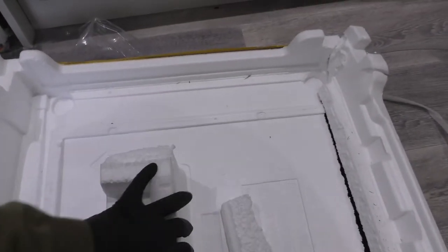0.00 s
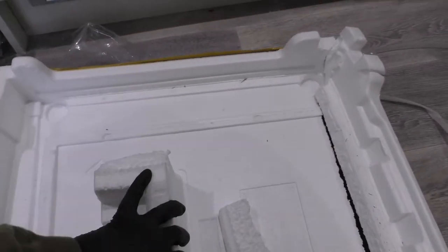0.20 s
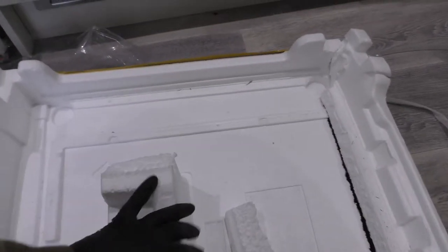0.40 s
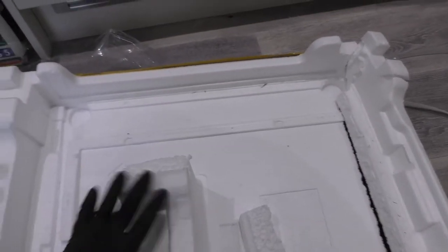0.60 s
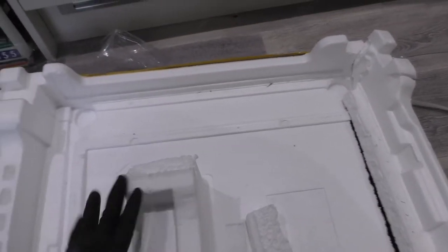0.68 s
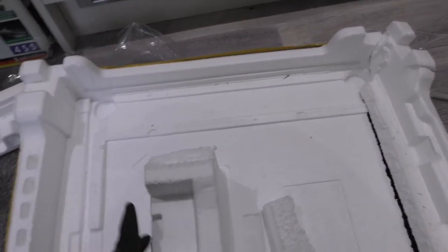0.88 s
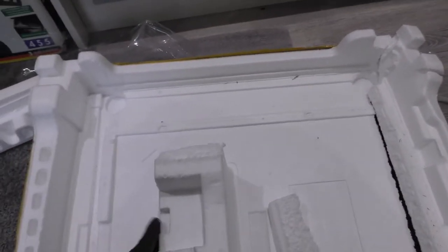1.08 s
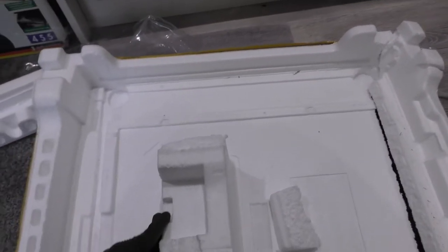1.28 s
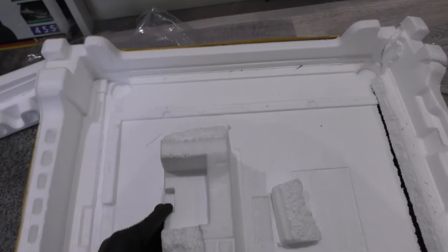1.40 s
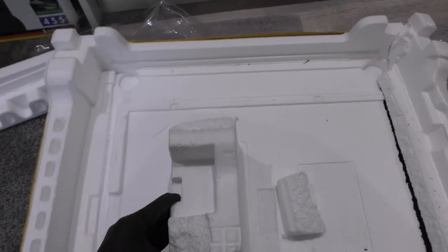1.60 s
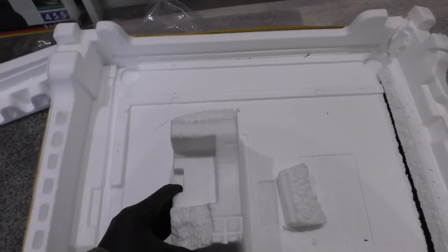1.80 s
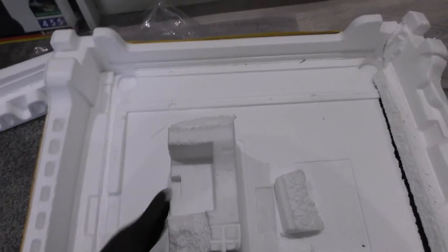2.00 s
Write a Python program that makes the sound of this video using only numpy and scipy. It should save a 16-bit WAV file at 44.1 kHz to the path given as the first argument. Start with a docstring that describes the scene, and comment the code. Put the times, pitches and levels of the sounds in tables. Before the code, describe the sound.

A hand rubs and knocks a big foam tray: harsh squeaky scrapes, crisp snaps, low thumps

```python
"""Hand on a foam tray

A hand rubs, squeezes and knocks a large foam tray in a quiet room. Slipping beads are dense random
impulses through foam colour and resonances; squeaks and squeals are wavering sines; cracks are noise snaps.
The light panel booms near 350 Hz: decaying sines, swelling tones and noise-driven modes.
Feedback delays add the room, over coloured noise and a faint low drone; gain ducks after loud moments."""
import sys
import numpy as np
from scipy import signal
from scipy.fft import rfft, irfft, next_fast_len
from scipy.io import wavfile
from scipy.ndimage import uniform_filter1d

SR = 44100
rng = np.random.default_rng(int(sys.argv[2]) if len(sys.argv) > 2 else 0)


def to_linear_factor(level_db):
    """Convert decibel levels (scalar or array-like) to linear amplitude factors."""
    exponent = np.asarray(level_db, float) / 20
    return 10 ** exponent


def inscribe(sig):
    """Save sig as 16-bit PCM at rate SR to the path in sys.argv[1].

    A 1-D sig is mono; a 2-D sig holds one channel per row.
    Samples are clipped to [-1, 1] before scaling.
    """
    pcm = np.round(np.clip(np.atleast_2d(sig).T, -1, 1) * 32767)
    wavfile.write(sys.argv[1], SR, pcm.astype(np.int16))


N = 90405


def rms_one(x):
    """Scale to rms 1."""
    return x / np.sqrt(np.mean(x ** 2) + 1e-20)


def since(start_s):
    """Seconds since a moment, negative before it."""
    return np.arange(N) / SR - start_s


def in_time(rows):
    """Table columns interpolated linearly over time."""
    time_s, *columns = np.transpose(rows)
    return [np.interp(since(0), time_s, column) for column in columns]


def gate(rows, fade_s):
    """Open from the first to the last row, with linear fades inside."""
    return np.clip(np.minimum(since(rows[0][0]), -since(rows[-1][0])) / fade_s, 0, 1)


def band(x, low_hz, high_hz, order=2):
    """Butterworth band-pass."""
    return signal.sosfilt(signal.butter(order, [low_hz, high_hz], "band", fs=SR, output="sos"), x)


def colour(x, spectrum):
    """Shape by a spectrum table, log-frequency interpolation, rms 1."""
    hz, db = np.transpose(spectrum)
    f = np.maximum(np.arange(N // 2 + 1) * SR / N, 1)
    gain_db = np.interp(np.log(f), np.log(hz), db)
    return rms_one(irfft(rfft(x) * to_linear_factor(gain_db), N))


def resonance(x, hz, width_hz):
    """Two-pole peak, gain about 1 on top."""
    r = np.exp(-np.pi * width_hz / SR)
    numerator = [(1 - r * r) / 2, 0, (r * r - 1) / 2]
    return signal.lfilter(numerator, [1, -2 * r * np.cos(2 * np.pi * hz / SR), r * r], x + 1e-18)


def wobble(rate_hz):
    """Noise through two equal low-pass poles, rms 1."""
    r = np.exp(-2 * np.pi * rate_hz / SR)
    noise = rng.standard_normal(N + 4000)
    return rms_one(signal.lfilter([1], [1, -2 * r, r * r], noise)[4000:])  # drop the settling


SLIPS_PER_S, SLIP_SPREAD_DB = 16000, 2.5


def slips():
    """Dense bead slips: random-sign impulses of uneven strength."""
    hit = rng.random(N) < SLIPS_PER_S / SR
    strength = to_linear_factor(SLIP_SPREAD_DB * np.minimum(rng.exponential(1, N), 4))
    return hit * strength * rng.choice([-1, 1], N)


# rubbing strength: time_s, treble_db, then relative to treble: high_db, middle_db, dull_db
RUB_LEVELS = [(0.0, -44.5, 3, 6.5, 11), (0.02, -45, -0.5, 1, -4.5), (0.141, -71, -7, 6.5, 8),
              (0.147, -45, 0.5, 2, 0), (0.2, -52.5, -2, 4.5, 0.5), (0.22, -45, 12, 5, -3),
              (0.226, -42.5, 5, 11.5, 6), (0.28, -48.5, -4.5, 6.5, 2.5), (0.32, -51.5, 2, 5.5, 4),
              (0.33, -36, 2, 8, -2.5), (0.35, -23, 0.5, -0.5, -22), (0.38, -23, -7, -5, -45),
              (0.39, -32, -4, -10, -26), (0.41, -28, -4.5, -8.5, -46), (0.44, -35, 7, 2, -33),
              (0.45, -35, 0.5, -3, -13), (0.6, -50.5, -6.5, 7, 5), (0.64, -48, -8, 13.5, 15),
              (0.71, -46, 4.5, 7, 1.5), (0.8, -56, 0, 5.5, 15), (0.866, -53, 4, 6, 4),
              (0.89, -39, -6, 11.5, 7.5), (0.92, -28.5, 1.5, -1.5, -1), (0.95, -36, 0.5, 4.5, -1),
              (1.0, -33, 3, 0.5, -8.5), (1.06, -36.5, 0, -1.5, -3), (1.14, -31.5, -5.5, -3.5, -8),
              (1.17, -36.5, -5, 3, -4), (1.18, -30, 1, -3, -17.5), (1.23, -33.5, 5.5, -7, -13.5),
              (1.38, -51.5, -1, -6.5, -9.5), (1.518, -67, 1, 7, 13.5), (1.54, -55.5, 6.5, 5, 4),
              (1.592, -72, 3, -1, 8), (1.6, -52.5, 5, 3.5, 10.5), (1.64, -61.5, 1, 5, 1),
              (1.73, -57.5, -4, 6.5, 13.5), (1.75, -38.5, -3.5, 4, 0), (1.83, -58, -3.5, 6, 3.5),
              (2.05, -77, 2, -2, 18.5)]
# foam colour: frequency_hz, density_db (per Hz)
FOAM_COLOUR = [(300, -49), (500, -1), (580, -20), (670, -12.5), (800, -17.5), (1100, -6.5), (1550, -8),
               (2300, -4.5), (3000, -5), (6000, -6.5), (10500, -3.5), (13000, -7), (15800, -5.5),
               (19000, -7)]
# treble, high, middle, dull bands: low_hz, high_hz
RUB_BAND_EDGES = [(4180, 7700), (8400, 13900), (1730, 3710), (543, 1520)]
CLUMP_DB, RUB_GAIN_DB = 2, -2


def rub():
    """Slips coloured by the foam; four bands follow the pressure, each with its own clumps."""
    treble_db, high_db, middle_db, dull_db = in_time(RUB_LEVELS)
    x = colour(slips() * to_linear_factor(0.92 * wobble(160)), FOAM_COLOUR)
    treble, high, middle, dull = [
        rms_one(band(x, low_hz, high_hz, order=3) * to_linear_factor(CLUMP_DB * wobble(65)))
        for low_hz, high_hz in RUB_BAND_EDGES]
    mix = treble + to_linear_factor(high_db) * high + to_linear_factor(middle_db) * middle + to_linear_factor(dull_db) * dull
    return to_linear_factor(RUB_GAIN_DB + treble_db) * mix


# rubbed foam resonances: pitch_hz, width_hz, stroke_1_db, stroke_2_db, stroke_3_db
FOAM_MODES = [(1960, 140, -16, 3, -10.5), (2296, 70, -8, -0.5, -12), (2656, 90, 2, -7, -17),
              (3220, 90, -4, -14, -31), (4780, 80, 2, -8, -19), (5490, 260, -2, -3, -7.5),
              (6600, 89, -15, -8, -12), (7290, 150, -26, -22, -11), (7920, 120, -18, -23, 1),
              (8460, 86, -16, -21, -2.5), (9340, 150, -1.5, -9, -0.5), (10430, 160, -7, -5.5, -3),
              (12000, 150, -13, -4.5, -11)]
# three hard strokes, each a list of: time_s, level_db
STROKE_LEVELS = [
    [(0.32, -34), (0.33, -36), (0.362, -15), (0.384, -25), (0.414, -29.5), (0.436, -20.5), (0.454, -28),
     (0.506, -34), (0.6, -54)],
    [(0.87, -34), (0.89, -30), (0.994, -26), (1.05, -49)],
    [(1.17, -33), (1.18, -34), (1.222, -31), (1.23, -29), (1.244, -35), (1.256, -25), (1.274, -30),
     (1.322, -32.5), (1.42, -54.5)],
]
STROKE_GAIN_DB, RING_FLUTTER_DB = -3.5, 2.2


def strokes():
    """Hard strokes make the foam resonances sing, each with its own flutter."""
    rings = [rms_one(resonance(slips(), hz, width_hz)) * to_linear_factor(RING_FLUTTER_DB * wobble(40))
             for hz, width_hz, *_ in FOAM_MODES]
    out = np.zeros(N)
    for k, rows in enumerate(STROKE_LEVELS):
        song = rms_one(sum(to_linear_factor(mode[2 + k]) * ring for mode, ring in zip(FOAM_MODES, rings)))
        out += gate(rows, 0.0047) * to_linear_factor(in_time(rows)[0] + STROKE_GAIN_DB) * song
    return out


# stick-slip squeaks, each a list of: time_s, slip_rate_hz, level_db
SQUEAK_TRACKS = [
    [(0.32, 2327, -43), (0.356, 2463, -25), (0.408, 2642, -40), (0.438, 2590, -19.5), (0.452, 2605, -38.5),
     (0.516, 2673, -32.5), (0.568, 2680, -47), (0.58, 2614, -44)],
    [(0.87, 2136, -51), (0.9, 2105, -30), (0.93, 2087, -25), (0.986, 2210, -38), (1.05, 2580, -57)],
    [(1.17, 2490, -46), (1.178, 2460, -23), (1.23, 2430, -45)],
]
# one lower squeak: time_s, slip_rate_hz, level_db
LOW_SQUEAK_TRACK = [(1.03, 1480, -48), (1.076, 1485, -36), (1.17, 1540, -42)]
# harmonics 2 to 5, relative to the fundamental: level_db
OVERTONE_LEVELS_DB = [-9, -11.5, -18, -29]
SQUEAK_JITTER_RATIO, SQUEAK_GAIN_DB = 0.0353, -3


def squeaks():
    """Nearly regular slips: a wavering tone with overtones, broken up in level."""
    out = np.zeros(N)
    for rows in [*SQUEAK_TRACKS, LOW_SQUEAK_TRACK]:
        hz, db = in_time(rows)
        phase = 2 * np.pi * np.cumsum(hz * (1 + SQUEAK_JITTER_RATIO * wobble(301.5))) / SR
        tone = np.sin(phase)
        for k, overtone_db in enumerate(OVERTONE_LEVELS_DB):
            tone += to_linear_factor(overtone_db) * np.sin((k + 2) * phase)
        out += gate(rows, 0.0065) * to_linear_factor(db + SQUEAK_GAIN_DB + 2.3 * wobble(130)) * tone
    return out


# short squeals: start_s, length_s, pitch_hz, level_db
SQUEAL_EVENTS = [(0.33, 0.014, 2130, -23.5), (1.0, 0.043, 2750, -39), (1.001, .04, 4910, -33.5),
                 (0.368, 0.014, 4790, -22), (0.347, 0.018, 9400, -34), (0.428, 0.016, 3210, -23),
                 (0.351, 0.015, 2400, -20), (0.633, 0.014, 940, -29.5), (0.33, 0.026, 2400, -24.5),
                 (0.927, 0.011, 2050, -32), (0.976, 0.015, 2330, -29.5), (1.1755, .009, 2500, -26),
                 (1.179, 0.011, 7290, -22), (1.19, 0.013, 7310, -22.5), (1.192, 0.01, 6460, -27),
                 (1.195, 0.0067, 11500, -27), (1.196, 0.0072, 10600, -22), (1.196, 0.0071, 5270, -29),
                 (1.21, .014, 7570, -25), (1.226, .008, 10500, -21.5), (1.229, 0.01, 12000, -30),
                 (1.251, .006, 8400, -32), (1.256, 0.0053, 9726, -22), (1.256, 0.0065, 13100, -26),
                 (1.264, 0.028, 8400, -34), (1.52, 0.0049, 2100, -44), (1.531, 0.0076, 4300, -50),
                 (1.627, 0.0077, 3300, -52), (1.594, .008, 6660, -52), (1.595, 0.0052, 4300, -45),
                 (1.841, 0.0072, 4300, -55)]
SQUEAL_WAVER_HZ, SQUEAL_GAIN_DB = 90.2, 1.5


def squeals():
    """Brief narrow whistles as a bead sings: a wavering tone that starts fast and flutters."""
    out = np.zeros(N)
    for start_s, length_s, hz, db in SQUEAL_EVENTS:
        phase = 2 * np.pi * np.cumsum(hz + SQUEAL_WAVER_HZ * wobble(246)) / SR
        tone = np.sin(phase) * to_linear_factor(1.6 * wobble(190))
        progress = np.clip(since(start_s) / length_s, 0, 1)
        envelope = np.clip(np.sin(np.pi * progress ** 0.86), 0, 1) ** 0.87
        out += to_linear_factor(db + SQUEAL_GAIN_DB) * tone * envelope
    return out


# cracks: start_s, level_db, low_db (relative to level), top_db (relative to level), t60_s
CRACK_EVENTS = [(0.1439, -34, 7.5, -14, 0.049), (0.2131, -30, -16, 9, 0.029),
                (0.4317, -29, -36, -14, 0.028), (0.6236, -30, 8, -17, 0.048),
                (0.641, -27.5, 14, -19, 0.035), (0.654, -23.5, 4.5, -5, 0.029),
                (0.691, -27.5, -6, 0.5, 0.069), (0.875, -29.5, 4.5, -14, 0.032),
                (1.1754, -14, -26, -7, 0.031), (1.1909, -17, -26, 8, 0.045), (1.2276, -26, -27, -1, 0.039),
                (1.2508, -26, -36, 13, 0.054), (1.519, -37.5, 5.5, -10, 0.03),
                (1.5314, -34, 5.5, 4.5, 0.02), (1.595, -39, 4.5, -12, 0.037),
                (1.628, -36.5, -19, -19, 0.03), (1.7419, -27.5, -4, -10, 0.036),
                (1.8412, -34, -14, -1.5, 0.028), (1.9006, -38, -16, -9, 0.036),
                (1.9883, -41.5, 3, -2, 0.022), (2.017, -44.5, 5.5, -19, 0.037)]
CRACK_GAIN_DB, CRACK_ATTACK_S = -8, 0.0013


def cracks():
    """Fast-dying snaps of noise, duller and brighter parts with their own strength."""
    noise = rng.standard_normal((3, N)) * to_linear_factor(3.2 * wobble(420))
    mid = rms_one(band(noise[0], 2000, 7500))
    low = rms_one(band(noise[1], 800, 1900, order=3))
    top = rms_one(band(noise[2], 7500, 19000))
    out = np.zeros(N)
    for start_s, db, low_db, top_db, t60_s in CRACK_EVENTS:
        t = np.maximum(since(start_s), 0)
        envelope = to_linear_factor(db + CRACK_GAIN_DB - 60 * t / t60_s) * np.minimum(t / CRACK_ATTACK_S, 1)
        out += envelope * (mid + to_linear_factor(low_db) * low + to_linear_factor(top_db) * top)
    return out


# knocks on the panel: start_s, level_db, pitch_hz, t60_s, thud_db (relative to level)
KNOCK_EVENTS = [(0.1435, -27, 322, 0.027, -3), (0.238, -15, 248, 0.032, -13),
                (0.255, -19.5, 265, 0.046, -29), (0.522, -26, 330, 0.033, -13),
                (0.544, -28, 339, 0.022, -18), (0.629, -25, 347, 0.049, -17), (0.657, -20, 356, 0.051, -15),
                (0.748, -26, 396, 0.023, -11), (1.085, -26, 355, 0.035, -33), (1.532, -27, 368, 0.032, -9),
                (1.595, -25.5, 358, 0.022, -19), (1.604, -25, 347, 0.026, -25),
                (1.701, -18.5, 340.6, 0.026, -34), (1.751, -19, 350, 0.026, -27),
                (1.768, -23, 297, 0.027, -31)]
THUD_HZ, THUD_T60_S = 120, 0.065
CONTACT_RATE_PER_S, KNOCK_GAIN_DB = 556, -2


def knocks():
    """Soft contact starts a briefly ringing panel sine over a lower thud."""
    out = np.zeros(N)
    for start_s, db, hz, t60_s, thud_db in KNOCK_EVENTS:
        t = np.maximum(since(start_s), 0)
        ring = 2 * to_linear_factor(-60 * t / t60_s) * np.sin(2 * np.pi * hz * t)
        thud = to_linear_factor(thud_db - 60 * t / THUD_T60_S) * np.sin(2 * np.pi * THUD_HZ * t)
        contact = (1 - np.exp(-t * CONTACT_RATE_PER_S)) ** 2
        out += to_linear_factor(db + KNOCK_GAIN_DB) * contact * (ring + thud)
    return out


# panel swells: thumps, low thuds and groans: start_s, length_s, start_hz, end_hz, level_db
SWELL_EVENTS = [(.2268, 0.0098, 314, 286, -12), (.226, 0.0207, 205, 190, -20),
                (.225, 0.033, 120, 120, -29.5), (.522, 0.024, 132, 130, -38.5), (1.672, .03, 367, 400, -28),
                (1.712, 0.03, 420, 358, -28.5), (1.745, 0.028, 350, 342, -27), (.54, 0.024, 322, 327, -30),
                (0.98, 0.022, 370, 388, -29.5), (.889, 0.0166, 367, 393, -18),
                (0.037, 0.027, 314, 316, -38)]


def swells():
    """A short panel tone swells and dies, at steady or linearly gliding pitch."""
    out = np.zeros(N)
    for start_s, length_s, start_hz, end_hz, db in SWELL_EVENTS:
        u = np.clip(since(start_s) / length_s, 0, 1)
        cycles = length_s * (start_hz * u + (end_hz - start_hz) * u * u / 2)
        out += to_linear_factor(db) * np.sin(np.pi * u ** 1.43) * np.sin(2 * np.pi * cycles)
    return out


# higher panel mode while the hand presses: time_s, level_db
PRESS_LEVELS = [(0.5, -70), (0.55, -46), (0.584, -61), (0.71, -59), (0.79, -43.5), (0.864, -53.5),
                (0.93, -41), (1.012, -60), (1.05, -70)]
PRESS_MODE_HZ, PRESS_MODE_WIDTH_HZ = 654, 18.5


def pressed_mode(drive):
    """Noise rings one narrow mode while the hand presses."""
    ring = rms_one(resonance(drive, PRESS_MODE_HZ, PRESS_MODE_WIDTH_HZ))
    return gate(PRESS_LEVELS, 0.016) * to_linear_factor(in_time(PRESS_LEVELS)[0]) * ring


# panel shaken by the hand: time_s, level_db
SHAKE_LEVELS = [(0, -33), (.05, -45.5), (.14, -60), (.146, -39.5), (.21, -45), (.225, -38), (.27, -35.5),
                (.3, -45.5), (.35, -37.5), (.39, -68), (.46, -51), (.51, -47), (.53, -34), (.56, -36),
                (.6, -44.5), (.63, -33), (.69, -33.5), (.73, -40), (.76, -32.5), (.83, -37), (.87, -42),
                (.92, -32), (.95, -39.5), (1.0, -38), (1.07, -44.5), (1.09, -34.5), (1.15, -45),
                (1.18, -42), (1.22, -62), (1.4, -57.5), (1.51, -48), (1.54, -41.5), (1.58, -50.5),
                (1.605, -37.5), (1.65, -53), (1.7, -36.5), (1.765, -31), (1.785, -41), (1.85, -42.5),
                (1.87, -50.5), (1.97, -47.5), (2.05, -54)]
# low panel modes: pitch_hz, width_hz, level_db
PANEL_MODES = [(197, 45, -8), (243.2, 20, -1.5), (291, 32, -2), (358, 32.4, 0), (397.4, 51, -1.5),
               (457, 80, -9)]
SHAKE_GAIN_DB, SHAKE_LOW_DB = -2, -16.5


def shake(drive):
    """The shaking hand drives the low modes with noise; mode signs alternate."""
    modes = sum((-1) ** k * to_linear_factor(db) * resonance(drive, hz, width_hz)
                for k, (hz, width_hz, db) in enumerate(PANEL_MODES))
    boom = rms_one(band(modes, 214, 557))
    rumble = rms_one(band(drive, 85, 150))
    return to_linear_factor(in_time(SHAKE_LEVELS)[0] + SHAKE_GAIN_DB) * (boom + to_linear_factor(SHAKE_LOW_DB) * rumble)


def panel():
    """Knocked, swelling, pressed and shaken panel; one noise drives both mode sets."""
    drive = rng.standard_normal(N)
    return band(knocks() + swells() + pressed_mode(drive), 48, 7200) + shake(drive)


ROOM_T60_S = 0.28  # before wall damping
WALL_CORNER_HZ, WALL_POWER = 6100, 0.53  # one-pole response raised to this power


def room(x):
    """Ten feedback delays a side, treble damped on each pass."""
    size = next_fast_len(N + SR)
    w = 2 * np.pi * np.arange(size // 2 + 1) / size
    wall = (1 / (1 + 1j * w * SR / (2 * np.pi * WALL_CORNER_HZ))) ** WALL_POWER
    spectrum = rfft(x, size)
    out = []
    for delays_s in rng.uniform(.008, .035, (2, 10)):
        loops = [to_linear_factor(-60 * d / ROOM_T60_S) * wall * np.exp(-1j * w * d * SR) for d in delays_s]
        response = sum((-1) ** k * loop / (1 - loop) for k, loop in enumerate(loops))
        out.append(irfft(spectrum * response, size)[:N])
    return np.array(out)


# room noise: frequency_hz, density_db (per Hz)
ROOM_NOISE = [(12, -47), (20, -17), (86, 12), (187, -1.5), (328, 3.5), (607, -11.5), (1090, -19),
              (2260, -10), (5080, -23), (10500, -23), (16000, -31)]
NOISE_DB = -51.5
DRONE_HZ, DRONE_WIDTH_HZ, DRONE_DB = 125.4, 6.4, -59.5


def hum():
    """Coloured room noise, mostly alike on both sides, plus a faint low drone."""
    mid = colour(rng.standard_normal(N), ROOM_NOISE)
    side = colour(rng.standard_normal(N), ROOM_NOISE)
    side = to_linear_factor(-9.5) * side + to_linear_factor(-19) * band(side, 500, 18000) + band(side, 12, 39)
    noise = mid + side * np.array([[1], [-1]])
    drone = rms_one(resonance(rng.standard_normal(N), DRONE_HZ, DRONE_WIDTH_HZ))
    return to_linear_factor(DRONE_DB) * drone + to_linear_factor(NOISE_DB) * noise


PAN_DB = 0.3  # first channel up, second down
ROOM_GAIN_DB, BOOM_SEND_DB = -15.5, -11.5


def scene():
    """Foam near the microphone, its room and the noise floor."""
    foam = rub() + strokes() + squeaks() + squeals() + cracks()
    boom = panel()
    wet = room(foam + to_linear_factor(BOOM_SEND_DB) * boom)
    wet = wet + to_linear_factor(2.5) * band(wet, 10400, 18000)
    direct = (foam + boom) * to_linear_factor(np.array([[PAN_DB], [-PAN_DB]]))
    return direct + to_linear_factor(ROOM_GAIN_DB) * wet + hum()


def band_limit(x):
    """A steep low-pass at the top of the band."""
    return signal.sosfilt(signal.butter(12, 16170, fs=SR, output="sos"), x)


LIMIT_DB, LIMIT_SMOOTHING_S = -23, 0.017
LIMIT_SHARE = 0.78  # dB of cut per dB of held excess
EXCESS_RELEASE_DB_PER_S = 49  # before LIMIT_SHARE
STOPBAND_HZ = 16400


def record(dry):
    """Gain control ducks after loud moments and recovers slowly; a steep low-pass follows."""
    power = uniform_filter1d(np.mean(dry ** 2, axis=0), size=200)
    over_db = np.maximum(10 * np.log10(power + 1e-12) - LIMIT_DB, 0)
    ramp_db = EXCESS_RELEASE_DB_PER_S * np.arange(N) / SR
    held_db = np.maximum.accumulate(over_db + ramp_db) - ramp_db
    r = np.exp(-1 / (LIMIT_SMOOTHING_S * SR))
    smooth_db = signal.lfilter([1 - r], [1, -r], held_db)
    lowpass = signal.cheby2(16, 60, STOPBAND_HZ, fs=SR, output="sos")
    mix = signal.sosfilt(lowpass, dry * to_linear_factor(-LIMIT_SHARE * smooth_db))
    return band_limit(mix)


dry = scene()
out = record(dry)
inscribe(out)
```